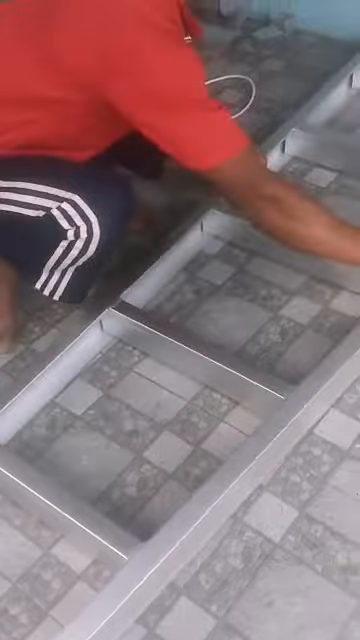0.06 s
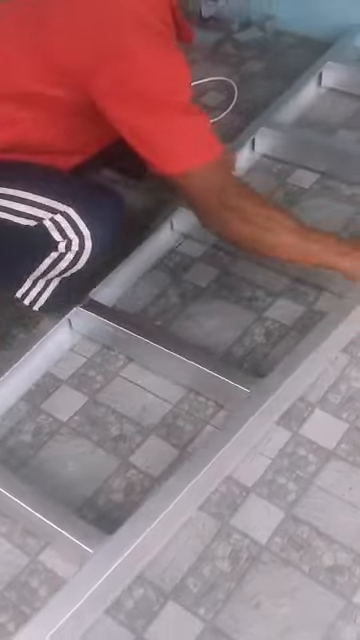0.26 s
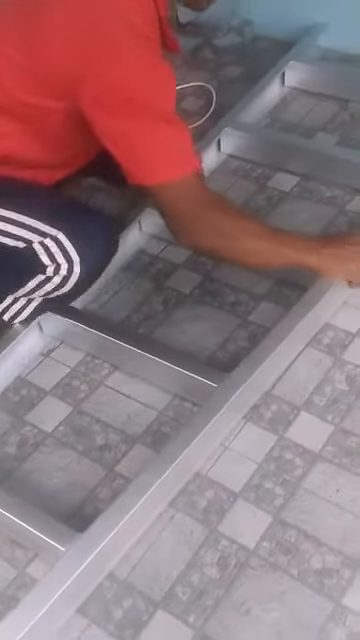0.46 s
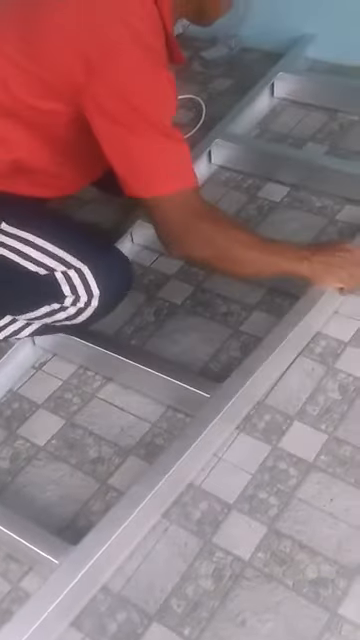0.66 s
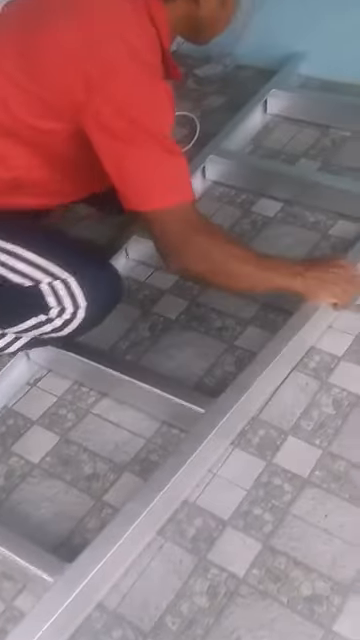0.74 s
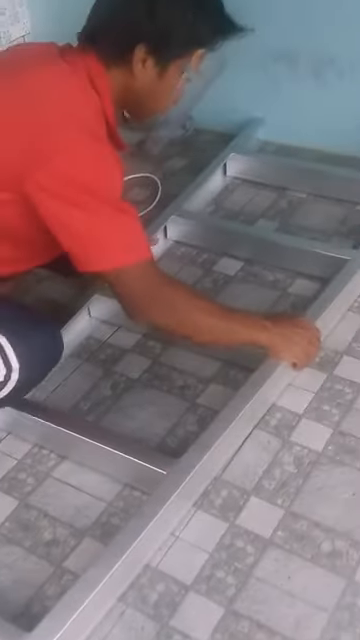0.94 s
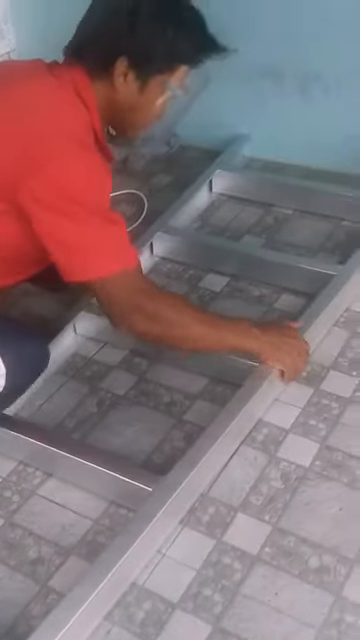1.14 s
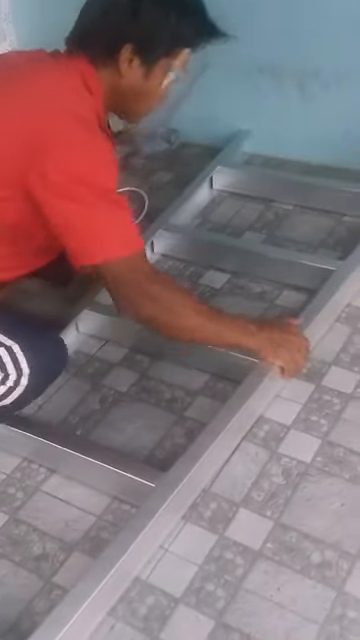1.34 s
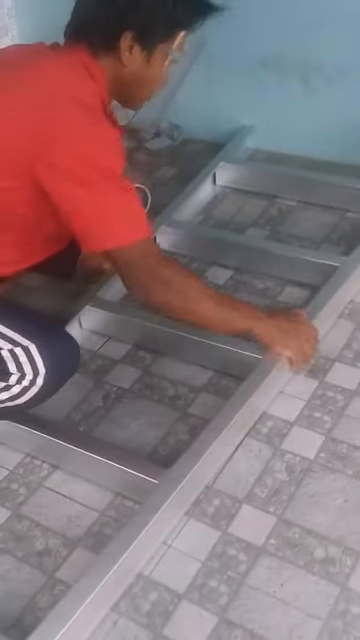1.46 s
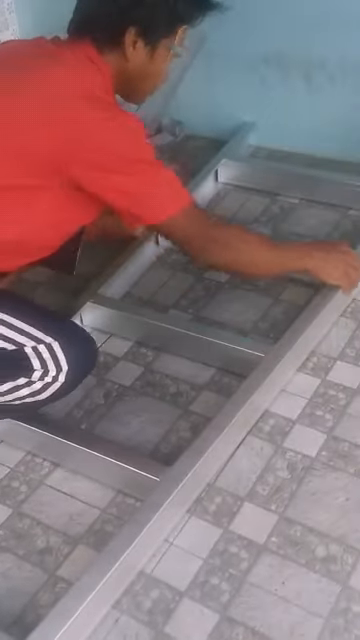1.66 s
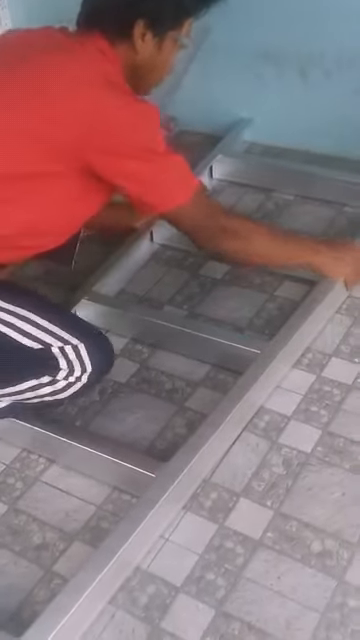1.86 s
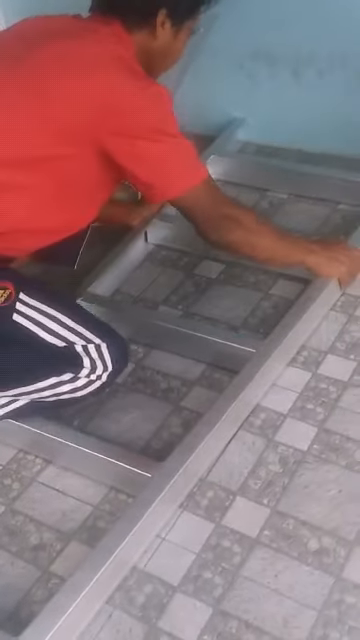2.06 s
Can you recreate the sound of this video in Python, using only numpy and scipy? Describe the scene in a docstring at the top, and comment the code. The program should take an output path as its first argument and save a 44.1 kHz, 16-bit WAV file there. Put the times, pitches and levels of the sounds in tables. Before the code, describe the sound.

A metal frame drags across tiles, lands with a ringing clack and shifts a little.

```python
"""A bare room with a tiled floor: a frame of hollow metal bars is dragged, knocks down, is nudged into place.
Stick-slip makes the bars judder and briefly groan while grit rasps under their edges.
Each knock chatters, thumps a bar and rings the frame.
Light sliding hisses between the knocks, over a low room rumble and a faint hum."""
import sys
import numpy as np
from scipy import signal
from scipy.fft import rfft, irfft
from scipy.io import wavfile
from scipy.ndimage import uniform_filter1d

SR = 44100
rng = np.random.default_rng(int(sys.argv[2]) if len(sys.argv) > 2 else 0)


def store_pcm(level_fs):
    """Save levels as 16-bit WAV."""
    pcm = np.round(np.clip(level_fs, -1, 1) * 32767).astype(np.int16)
    wavfile.write(sys.argv[1], SR, np.atleast_2d(pcm).T)


N = 92610
FFT_SIZE = 2 ** 17
TIME_S = np.arange(N) / SR
FREQ_HZ = np.fft.rfftfreq(FFT_SIZE, 1 / SR)

# Long drag. Each row: time in seconds, judder in dB, grit in dB.
DRAG_LEVELS = [(.125, -56, -54), (.16, -35, -41), (.2, -28.5, -33), (.26, -37, -32.5), (.345, -29, -31.5),
               (.385, -27.5, -31), (.43, -27.5, -27.5), (.49, -25, -30), (.53, -35.5, -35), (.59, -49, -55),
               (.63, -39, -51)]
# Light sliding. Each row: time in seconds, hiss in dB.
SLIDE_LEVELS = [(0, -49), (.13, -55.5), (.2, -40.5), (.86, -59), (.97, -58.5), (1.05, -60.5), (1.145, -51),
                (1.2, -76), (1.48, -61.5), (1.6, -50), (1.67, -44.5), (1.73, -43.5), (1.78, -43.5),
                (1.86, -48), (1.91, -58), (2.04, -51), (2.1, -65.5)]
# Each row: start and length in seconds, then grit, hiss, judder and hollow tube rasp in dB.
EDGE_SKIDS = [(-.03, .11, -59.5, -73, -54, -56.5), (0.267, 0.044, -31.5, -28.5, -47, -38),
              (0.352, 0.018, -29, -25, -48, -29), (0.403, 0.037, -44, -52, -32, -30.5),
              (0.447, 0.055, -49, -26.5, -27.5, -55), (0.629, 0.058, -34.5, -29.5, -32, -40),
              (0.856, 0.13, -64, -80, -52, -53.5), (1.234, 0.043, -49, -41, -43, -39.5),
              (1.494, 0.061, -45, -43.5, -37, -47.5), (1.733, 0.04, -39.5, -41, -45, -66),
              (1.757, 0.056, -54, -41.5, -34.5, -52.5), (1.918, 0.015, -51, -36, -42, -46),
              (1.957, 0.046, -53, -58, -37.5, -73)]
# Each row: start and length in seconds, pitch in Hz, level in dB.
BAR_GROANS = [(0.234, 0.073, 471.5, -32), (0.294, 0.057, 390, -35), (0.339, 0.04, 1420, -34.5),
              (0.373, 0.05, 330, -24.5), (0.398, 0.025, 1490, -37), (0.432, 0.19, 330.9, -33.5),
              (1.241, 0.035, 486, -29.5), (1.452, 0.21, 300.2, -49)]
# Each row: start in seconds, clack in dB, tilt in dB per octave, thump in dB, thump pitch in Hz,
# ring in dB, left over right in dB.
FRAME_KNOCKS = [(0.063, -51.5, -5.5, -66, 495, -49.5, 2.5), (.66, -19, 5.5, -20, 285, -23.5, -0.5),
                (.671, -33, 1.5, -21.5, 276, -24.5, -1.5), (.679, -27.5, -0.7, -18, 387, -26.5, 0.5),
                (0.729, -31, 1, -29, 400, -34.5, -0.5), (1.216, -48, 2, -71, 430, -72, 0),
                (1.259, -32.5, 1.5, -31, 433, -34.5, -0.5), (1.283, -36.5, -1.5, -38, 298, -46, -2.5),
                (1.531, -39, -4, -43, 497, -43.5, -1), (1.928, -38, 0.3, -39, 410, -48.5, -1),
                (2.02, -47.5, 2.5, -43.5, 144, -52.5, 1)]
# Low bending and high tube modes. Each row: frequency in Hz, level in dB, T60 in seconds.
FRAME_MODES = [(219.6, 1.5, 0.27), (281, 5, 0.35), (310, -4.5, 0.28), (369, 3.5, 0.47), (429.3, -1, 0.56),
               (495, 3.5, 0.4), (537, -20, 0.27), (632, -11.5, 0.29), (950, -13.5, 0.47), (1030, -14, 0.49),
               (1460, -8, 0.46), (1875, -7, 0.3), (2342, -2.5, 0.17), (2520, -18, 0.85), (2710, -5, 0.16),
               (3710, -13.5, 0.41), (4463, -15, 0.47), (6270, -22, 0.5), (7300, -25, 0.37), (7876, -7, 0.3)]
# Thin tube walls. Each row: centre and width in Hz, peak in dB at a wall share of 1.
WALL_RESONANCES = [(1474, 146, 7.5), (2632, 510, 5.5), (4680, 740, 1.5), (5220, 210, 1.5), (7120, 40, 4),
                   (7930, 360, 0), (9870, 110, 5), (11570, 310, 6), (13100, 1000, 11.5)]
# Source spectra. Each row: frequency in Hz, relative density in dB.
RUMBLE_SPECTRUM = [(15, -32), (27, -6.5), (42, 4), (60, -7.5), (85, 3), (103, -2), (130, -1.5), (250, -9.5),
                   (500, -17), (1000, -27.5), (4000, -32.5), (14500, -32)]
CLACK_SPECTRUM = [(200, -29), (700, 5), (1200, 4), (2000, 2.5), (3300, -0.5), (5500, -2.5), (7500, 4.5),
                  (10000, 0), (14500, -19.5)]
JUDDER_SPECTRUM = [(70, -33), (175, -18), (240, -21.5), (285, 2.5), (335, -4.5), (400, -2.5), (470, -5),
                   (640, -6.5), (780, -22.5), (2000, -38), (6000, -61)]
GRIT_SPECTRUM = [(200, -6), (600, -1), (1200, -1.5), (1900, -5.5), (2700, -3), (3600, -6), (6000, -5.5),
                 (10000, -6.5), (14500, -21)]
HOLLOW_SPECTRUM = [(400, -30.5), (1000, 8), (1450, 3.5), (1900, -1), (2600, -1.5), (3600, -32.5),
                   (9000, -28)]
HISS_SPECTRUM = [(400, -25), (1500, 0), (3500, -1.5), (6000, 3), (9000, 6.5), (12000, 8), (14500, 1.5)]
# Room tail. Each row: frequency in Hz, T60 in seconds.
ROOM_DECAY = [(100, 0.35), (400, 0.6), (1000, 0.7), (3000, 0.44), (7000, 0.41), (14000, 0.12)]
# Stereo colour. Each row: frequency in Hz, left over right in dB.
STEREO_BALANCE = [(100, -0.5), (450, 2.5), (850, -1.5), (1400, 0.5), (2600, 2), (4800, -1.5), (8000, 3),
                  (10500, 2.5), (13000, -2)]

BAND_EDGE_HZ, COHERENT_BELOW_HZ = 14450, 640
DIRECT_DB, EARLY_DB, EARLY_DECAY_S = -10.5, 10, 0.018
RUMBLE_DB, HUM_DB, HUM_HZ = -49, -58.5, 106.4
WALL_RIPPLE_DB, CONTACT_SHIFT_S = 3, 0.045
RING_RISE_S, TWIN_DB, TWIN_MAX_DETUNE = 0.0046, -13.5, 0.0304
GROAN_WAVER_HZ, GROAN_ROOM_DB = 23.33, -4
KNOCK_S, CHATTER_RISE_S, CHATTER_DECAY_S = 0.0071, 0.0061, 0.0049
THUMP_OCTAVES, THUMP_SKIRT_DB, THUMP_ROOM_DB = 0.58, 14, -3
FULL_PRESS_DB, LIGHT_JUDDER_HZ, DRAG_RING_DB = -29, 400, -8


def amp(db):
    """Decibels to gain."""
    return 10 ** (np.asarray(db) / 20)


def unit(x):
    """Scales to rms 1."""
    return x / np.sqrt(np.mean(abs(x) ** 2) + 1e-20)


def at_hz(points, hz):
    """Interpolates a table over log frequency."""
    points_hz, values = np.transpose(points)
    return np.interp(np.log(hz + 1), np.log(points_hz), values)


def envelope(table, column=1):
    """Gain over time from a dB column."""
    rows = np.array(table)
    return amp(np.interp(TIME_S, rows[:, 0], rows[:, column]))


def whiten(x, bins):
    """Evens out broad peaks and dips; energy about 1."""
    spectrum = rfft(x, 2 * x.shape[-1])
    power = uniform_filter1d(np.atleast_2d(abs(spectrum) ** 2).mean(0), bins)
    return irfft(spectrum / np.sqrt(abs(power) + 1e-12))[..., :x.shape[-1]]


def tube_walls_db():
    """Main wall resonances plus a ripple of weaker ones, different at each contact point."""
    ripple = unit(signal.fftconvolve(rng.standard_normal(len(FREQ_HZ)), np.hanning(2 ** 9), "same"))
    peaks_db = sum(db / (1 + (2 * (FREQ_HZ - hz) / width_hz) ** 2) for hz, width_hz, db in WALL_RESONANCES)
    return WALL_RIPPLE_DB * ripple + peaks_db


def colour(x, spectrum, wall_share=0):
    """Minimum-phase filter of unit power: a smooth spectrum plus a share of the wall resonances."""
    db = at_hz(spectrum, FREQ_HZ) - 40 * np.clip((FREQ_HZ - BAND_EDGE_HZ) / 1000, 0, 1)
    if wall_share:
        db = db + wall_share * tube_walls_db()
    cepstrum = irfft(np.log(unit(amp(db))))
    cepstrum[1:FFT_SIZE // 2] *= 2
    cepstrum[FFT_SIZE // 2 + 1:] = 0
    return irfft(rfft(x, FFT_SIZE) * np.exp(rfft(cepstrum)))[..., :N]


def excite(x, response):
    """Mono signal through a stereo response."""
    return signal.fftconvolve(x[None], response, axes=1)[:, :N]


def diffuse_noise(size):
    """Noise from all sides: left and right alike in the bass, unrelated in the treble."""
    mid, side = rfft(rng.standard_normal((2, size)))
    coherence = 0.985 * np.exp(-(np.fft.rfftfreq(size, 1 / SR) / COHERENT_BELOW_HZ) ** 3)
    mid, side = mid * np.sqrt(1 + coherence), side * np.sqrt(1 - coherence)
    return irfft(np.array([mid + side, mid - side]), size) / np.sqrt(2)


def background():
    """Low room rumble, slightly different on each side, and a faint hum."""
    noise = diffuse_noise(N) + 0.35 * rng.standard_normal((2, N))
    hum = np.sqrt(2) * np.sin(2 * np.pi * HUM_HZ * TIME_S)
    return amp(RUMBLE_DB) * unit(colour(noise, RUMBLE_SPECTRUM)) + amp(HUM_DB) * hum


def room():
    """Tiled room from one spot: weak direct sound, early floor and wall echoes, diffuse tail."""
    hz, t, bands = signal.stft(diffuse_noise(2 ** 15), SR, nperseg=256)
    early = amp(EARLY_DB) * np.exp(-t / EARLY_DECAY_S)
    late = amp(-60 * t / at_hz(ROOM_DECAY, hz)[:, None])
    response = signal.istft(bands * (early + late), SR, nperseg=256)[1]
    response /= np.linalg.norm(response[0])
    response[:, 0] += amp(DIRECT_DB)
    return whiten(response, bins=90)


def frame_ring():
    """Decaying modes beat with weaker, slightly detuned twins in neighbouring bars."""
    t, out = TIME_S[:SR * 3 // 4], 0
    draws = rng.uniform(-0.95, 1, (len(FRAME_MODES), 4))
    for (hz, db, t60_s), (phase, side, twin_phase, detune) in zip(FRAME_MODES, draws):
        lag_rad = np.sign(side) * min((hz / 650) ** 2, np.pi / 4) * np.array([[1], [-1]])
        twin_hz = hz * (1 + TWIN_MAX_DETUNE * (detune + np.sign(detune)) / 2)
        mode = np.sin(np.pi * (2 * hz * t + phase) + lag_rad)
        twin = amp(TWIN_DB) * np.sin(np.pi * (2 * twin_hz * t + twin_phase) - lag_rad)
        out = out + amp(db - 60 * t / t60_s) * (mode + twin)
    return out * (1 - np.exp(-t / RING_RISE_S))


def arch(start_s, length_s):
    """Half-sine envelope."""
    return np.sin(np.pi * np.clip((TIME_S - start_s) / length_s, 0, 1))


def groans():
    """Brief rough tones: stick-slip locks onto one resonance of a bar."""
    out = np.zeros(N)
    for start_s, length_s, hz, db in BAR_GROANS:
        waver_hz = GROAN_WAVER_HZ * unit(uniform_filter1d(rng.standard_normal(N), size=300))
        tone = np.sin(2 * np.pi * np.cumsum(hz + waver_hz) / SR)
        out += amp(db) * np.sqrt(abs(arch(start_s, length_s))) * tone
    return out + amp(GROAN_ROOM_DB) * excite(out, room())


def knocks():
    """Each blow chatters for milliseconds, thumps a hollow bar and leaves the frame ringing."""
    out, t = np.zeros((2, N)), TIME_S[:2 ** 11]
    click = 2 * np.sqrt(KNOCK_S * SR) * (t == 0)
    burst = np.exp(-t / CHATTER_DECAY_S) * (1 - np.exp(-t / CHATTER_RISE_S))
    grid_hz = np.geomspace(20, 16000, 60)
    for start_s, clack_db, tilt_db, thump_db, thump_hz, ring_db, pan_db in FRAME_KNOCKS:
        chatter = click[0] * whiten(rng.standard_normal(len(t)) * burst, bins=60)
        tilted = [(hz, db + tilt_db * np.log2(max(hz, 1000))) for hz, db in CLACK_SPECTRUM]
        clack = amp(clack_db) * colour(chatter, tilted, wall_share=1.7)[:len(t)]
        hump_db = -THUMP_SKIRT_DB * np.log10(1 + (np.log2(grid_hz / thump_hz) / THUMP_OCTAVES) ** 4)
        thump = amp(thump_db) * colour(click, np.c_[grid_hz, hump_db])[:len(t)]
        impact = excite(clack + amp(THUMP_ROOM_DB) * thump, room())
        for sound in (impact, amp(ring_db) * frame_ring() / 2):
            span = out[:, round(start_s * SR):][:, :sound.shape[1]]
            span += sound[:, :span.shape[1]] * amp([[pan_db / 2], [-pan_db / 2]])
    return out


def slips(per_s, spread_db):
    """Tiny slips of random size and sign, rms 1."""
    size = amp(spread_db * np.minimum(rng.exponential(1, N), 4))
    return unit(size * (rng.random(N) < per_s / SR) * rng.choice([-1, 1], N))


def shifting_contact(x, spectrum, wall_share):
    """The contact point shifts: the wall resonances crossfade through four patterns."""
    fades = [np.clip((TIME_S / CONTACT_SHIFT_S - k) % 4, 0, 2) for k in range(4)]
    return sum(colour(x * np.sin(np.pi * fade / 2), spectrum, wall_share) for fade in fades)


def bar_judder(gain):
    """Coarse slips shake the bars, deeper when pressed hard."""
    coarse = gain * slips(per_s=1200, spread_db=5)
    press = np.minimum(gain / amp(FULL_PRESS_DB), 1)
    light = signal.sosfiltfilt(signal.butter(2, LIGHT_JUDDER_HZ, "high", fs=SR, output="sos"), coarse)
    return press * coarse + (1 - press) * light


def scraping():
    """Drag, skids and light sliding: judder rings the frame, grit and fine hiss excite the tube walls."""
    dragging = (TIME_S > DRAG_LEVELS[0][0]) & (TIME_S < DRAG_LEVELS[-1][0])
    judder = dragging * envelope(DRAG_LEVELS, column=1)
    grit = dragging * envelope(DRAG_LEVELS, column=2)
    hiss, rub = envelope(SLIDE_LEVELS), np.zeros(N)
    for start_s, length_s, grit_db, hiss_db, judder_db, rub_db in EDGE_SKIDS:
        skid = arch(start_s, length_s)
        grit = np.hypot(grit, amp(grit_db) * skid)
        hiss = np.hypot(hiss, amp(hiss_db) * skid)
        judder = np.hypot(judder, amp(judder_db) * skid)
        rub += amp(rub_db) * skid
    hollow = shifting_contact(rub * slips(per_s=1200, spread_db=1), HOLLOW_SPECTRUM, wall_share=0.87)
    shake = bar_judder(judder)
    rasp = shifting_contact(grit * slips(per_s=4500, spread_db=4.5), GRIT_SPECTRUM, wall_share=1)
    fine = colour(hiss * slips(per_s=12000, spread_db=8), HISS_SPECTRUM, wall_share=0.2)
    modes = frame_ring()
    ring = amp(DRAG_RING_DB) * excite(shake, modes / np.linalg.norm(modes[0]))
    return excite(colour(shake, JUDDER_SPECTRUM) + rasp + hollow + fine, room()) + ring


def scene():
    """Frame and room, left and right coloured slightly differently."""
    mix = background() + scraping() + groans() + knocks()
    side_db = at_hz(STEREO_BALANCE, FREQ_HZ) / 2
    return irfft(rfft(mix, FFT_SIZE) * amp([side_db, -side_db]))[:, :N]


def record(dry):
    """Low-pass at the band edge."""
    taps = signal.firwin(401, BAND_EDGE_HZ, window=("kaiser", 9), fs=SR)
    return signal.oaconvolve(dry, taps[None], "same")


dry = scene()
out = record(dry)
store_pcm(out)
```